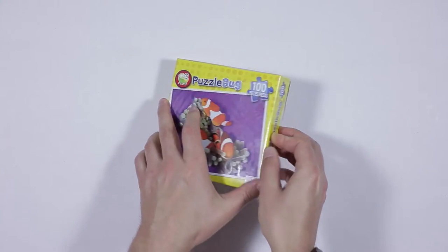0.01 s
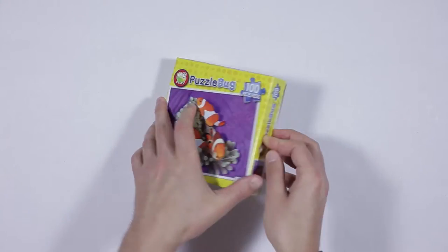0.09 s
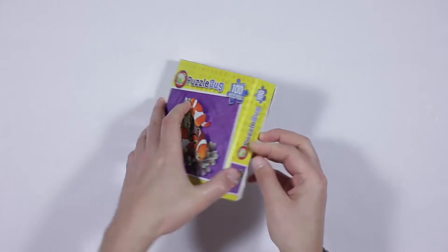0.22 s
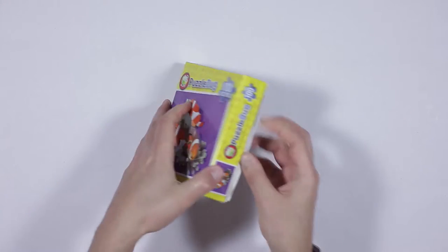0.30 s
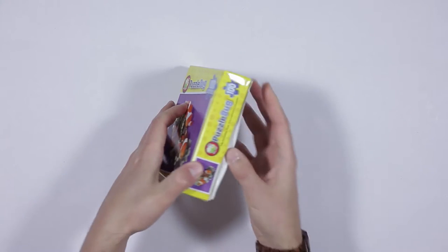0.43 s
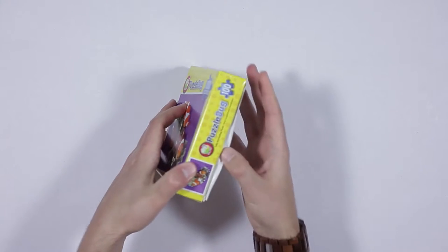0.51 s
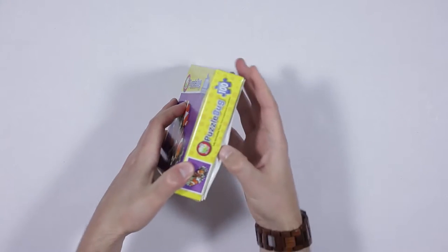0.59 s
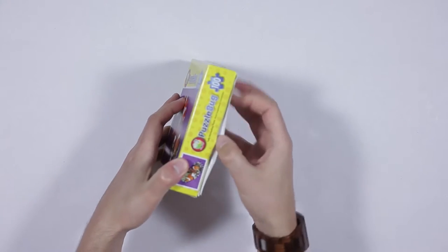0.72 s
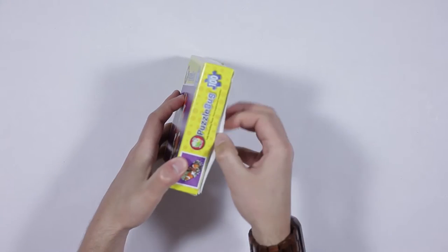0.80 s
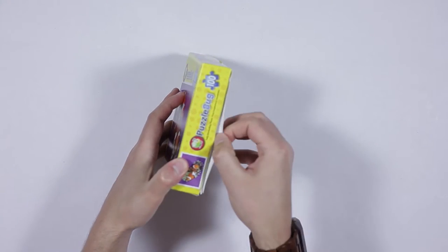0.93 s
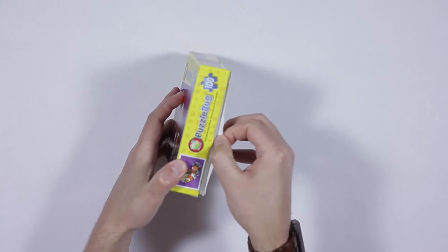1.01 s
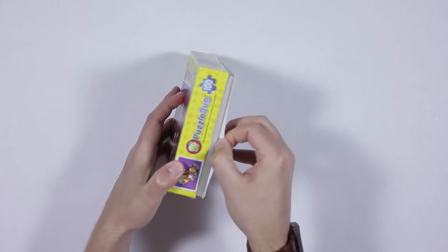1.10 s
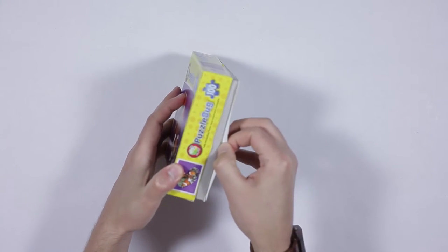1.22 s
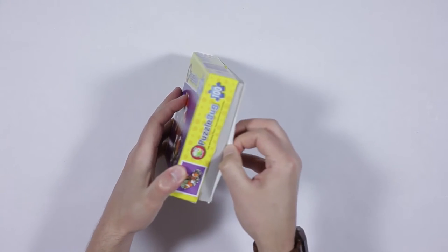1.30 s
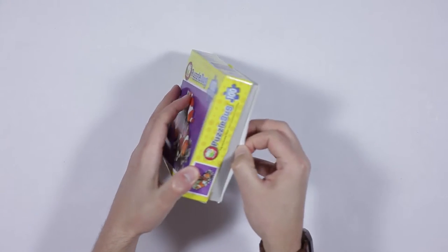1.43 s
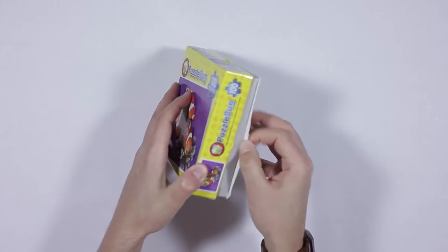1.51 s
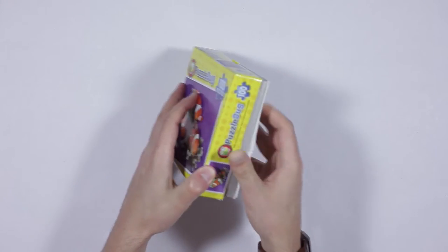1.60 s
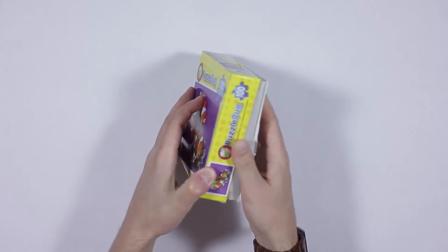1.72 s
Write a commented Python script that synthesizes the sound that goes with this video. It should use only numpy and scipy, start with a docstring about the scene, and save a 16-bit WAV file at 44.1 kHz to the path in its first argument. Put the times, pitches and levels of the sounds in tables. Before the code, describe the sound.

Cardboard puzzle box handled, its lid snapping loudly as loose pieces rattle inside, in a quiet room

```python
"""Hands turn a cardboard puzzle box and work at its lid while a quiet room hums throughout.
First fingers slide softly over the glossy card, loose pieces stir in the box and small ticks ride on top.
At 0.23 s the lid edge snaps free: a loud crack and rattle, then the pieces tumble and knock the hollow box.
Softer turns of the hands follow, with more ticks, knocks and sliding; at 1.46 s the lid snaps again, weaker,
and the box jolts. Bursts of noise make the snaps, ticks and knocks, streams of tiny contacts the rest."""
import sys
import numpy as np
from scipy import signal
from scipy.fft import rfft, irfft, next_fast_len
from scipy.io import wavfile
from scipy.ndimage import map_coordinates

SR = 44100
rng = np.random.default_rng(int(sys.argv[2]) if len(sys.argv) > 2 else 0)


def linear_from_db(decibels):
    """Turn decibels (scalar or array-like) into linear amplitude factors; 0 gives 1."""
    return 10 ** (np.asarray(decibels, float) / 20)


def unload_audio(sound):
    """Save the sound as a 16-bit wav file, at the path given as the first command line argument."""
    columns = np.transpose(np.atleast_2d(sound))
    # keep every value between -1 and 1, then stretch to whole-number steps
    steps = np.round(np.clip(columns, -1, 1) * 32767)
    wavfile.write(sys.argv[1], SR, steps.astype(np.int16))


N = 77175  # samples, 1.75 s


def unit(x):
    """Scale to rms 1."""
    return x / np.sqrt(np.mean(x ** 2) + 1e-20)


def along(points, hz):
    """Read (pitch_hz, value) points on a log pitch axis."""
    point_hz, value = np.transpose(points)
    return np.interp(np.log(hz + 1), np.log(point_hz + 1), value)


def filtered(x, response):
    """Shape x with a complex response of frequency."""
    size = next_fast_len(len(x) + 8192)
    spectrum = rfft(x, size) * response(np.fft.rfftfreq(size, 1 / SR))
    return irfft(spectrum, size)[:len(x)]


def causal(points):
    """Filter with the gain of (pitch_hz, level_db) points that answers as early as it can (minimum phase)."""
    def response(hz):
        cepstrum = irfft(np.log(np.maximum(linear_from_db(along(points, hz)), 1e-6)))
        half = len(cepstrum) // 2
        cepstrum[1:half] *= 2
        cepstrum[half + 1:] = 0
        return np.exp(rfft(cepstrum))
    return response


def resonances(peaks):
    """Ringing modes from (pitch_hz, width_hz, level_db); a narrow mode rings longer."""
    def response(hz):
        total = 0
        for k, (centre, width, db) in enumerate(peaks):
            damping = 1j * hz * width
            # neighbouring modes have opposite signs
            total = total + (-1) ** k * linear_from_db(db) * damping / (centre * centre - hz * hz + damping)
        return total
    return response


def high_pass(hz, corner_hz):
    """One gentle low cut: 6 dB per octave below the corner."""
    return hz / (hz - 1j * corner_hz)


def burst(t60, size=6000):
    """A sharp first contact and a dying spray of smaller ones; t60 in s, at least 0.002."""
    x = rng.standard_normal(size) * .5
    x[0] = 2
    return x * linear_from_db(-60 * np.arange(size) / SR / max(t60, .002))


def add(track, s, x, db):
    """Mix x into the track at time s with its peak at db."""
    part = track[round(s * SR):][:len(x)]
    part += linear_from_db(db) * (x / np.abs(x).max())[:len(part)]


def contacts(rate, spread_db):
    """Tiny impulses of uneven size (rate per second) on a bed of noise, coming in clumps."""
    bed_level, clump_db = 1.1, 1.1  # bed rms against the impulses; size of the swells
    chance, size = rng.random((2, N))
    hits = (chance < rate / SR) * linear_from_db(-spread_db * np.log(size + 1e-3)) * rng.standard_normal(N)
    clumps = map_coordinates(rng.standard_normal(N // 300 + 4), [np.arange(N) / 300])
    return unit((unit(hits) + bed_level * rng.standard_normal(N)) * linear_from_db(clump_db * clumps))


# when the levels jump at once to the next table, at the two lid snaps and at new movements of the hands:
# start_s
SECTION_STARTS = [.232, .508, .689, .885, 1.263, 1.461, 1.548]


def curves(tables):
    """One level per sample for each column after the time; each table rules until the next section starts."""
    t = np.arange(N) / SR
    each = []
    for start_s, *columns in map(np.transpose, tables):
        each.append([np.interp(t, start_s, column) for column in columns])
    section = np.searchsorted(SECTION_STARTS, t)
    return np.take_along_axis(np.array(each), section[None, None], axis=0)[0]


# the lid edge lets go: start_s, crack_peak_db, crack_t60_s, rattle_db (relative to the crack), rattle_t60_s
LID_SNAPS = [(.2316, 0, .004, -15, .04), (1.4612, -20, .006, -8, .045)]
# overall colour of the snap: pitch_hz, level_db
SNAP_TONE = [(250, -45), (500, -20), (1500, -12), (2100, -14), (2800, -3), (3900, -10), (4900, 1),
             (8600, 0), (9800, -9), (16000, -15)]
# the lid rings: pitch_hz, width_hz, level_db
LID_MODES = [(1540, 120, -4), (2540, 130, -2), (2880, 200, -5), (4750, 600, 0), (6050, 250, -2),
             (8000, 1200, -3)]


def snaps():
    """A broad crack rings the lid, then a longer burst rings it more strongly as a rattle."""
    out = np.zeros(N)
    for s, db, t60, rattle_db, rattle_t60 in LID_SNAPS:
        crack = filtered(burst(t60), lambda f: causal(SNAP_TONE)(f) + linear_from_db(-1) * resonances(LID_MODES)(f))
        add(out, s, crack, db)
        rattle = filtered(burst(rattle_t60), lambda f: causal(SNAP_TONE)(f) + linear_from_db(6) * resonances(LID_MODES)(f))
        add(out, s, rattle, db + rattle_db)
    return out


# notes of the hollow box: pitch_hz, width_hz, level_db
HOLLOW_MODES = [(621, 35, -6), (778, 60, 0), (865, 60, -7), (1090, 130, -8)]
# broad sound of the walls around those notes: pitch_hz, level_db (before the 15 dB cut below)
WALL_TONE = [(300, -40.5), (550, 4), (800, -9), (1300, -1.5), (2200, -57.5)]


def box(hz):
    """The box walls with their hollow resonances."""
    return resonances(HOLLOW_MODES)(hz) + linear_from_db(-15.0) * causal(WALL_TONE)(hz)


# big faces of the box: pitch_hz, width_hz, level_db
PANEL_MODES = [(260, 60, -11), (390, 30, -3), (443, 35, 0)]
# ringing of the card pieces: pitch_hz, width_hz, level_db
PIECE_MODES = [(1342, 35, -3.5), (1551, 69, -2.5), (1766, 71, -3.5), (2510, 750, -5), (3590, 990, -11.5),
               (4020, 1140, -12.5)]
# pieces tumbling, one table for each section between jumps: start_s, panels_db, hollow_body_db, clatter_db
TUMBLE_LEVELS = [
    [(0.0, -58, -51, -64), (0.02, -67, -50, -53), (0.056, -68.5, -57, -56), (0.13, -65, -54.5, -58.5),
     (0.146, -82, -58, -68), (0.156, -71, -60, -61), (0.216, -65, -55, -52.5)],
    [(0.242, -40, -41, -28.5), (0.257, -57, -31.5, -35), (0.272, -45.5, -41, -39),
     (0.318, -44, -36.5, -33.5), (0.41, -46, -40.5, -45), (0.454, -54, -46, -54.5),
     (0.495, -57, -53.5, -60.5)],
    [(0.512, -55, -45, -47.5), (0.524, -48.5, -58, -49.5), (0.54, -44.5, -48.5, -45.5),
     (0.606, -63, -50.5, -61), (0.63, -55.5, -54.5, -66), (0.652, -64, -62, -71), (0.676, -78, -72, -82)],
    [(0.694, -70, -64, -55), (0.714, -73, -68, -52.5), (0.73, -75, -53.5, -59), (0.758, -69, -68, -58.5),
     (0.772, -85, -84, -75), (0.87, -94, -93, -81), (0.872, -76, -81, -88)],
    [(0.89, -58.5, -54.5, -48.5), (0.984, -73, -62, -68.5), (1.008, -55.5, -62, -60.5),
     (1.07, -73, -58.5, -60.5), (1.108, -54, -54, -55), (1.212, -65.5, -56.5, -55.5),
     (1.255, -66, -63, -69)],
    [(1.27, -63, -65, -59), (1.288, -55.5, -56, -49.5), (1.32, -69, -55, -58), (1.338, -72, -45, -48.5),
     (1.362, -71, -53.5, -54), (1.392, -67, -51.5, -51), (1.414, -65, -47.5, -46), (1.446, -69, -52, -53.5)],
    [(1.472, -49.5, -52, -46), (1.515, -69, -56, -54), (1.538, -77, -64, -63)],
    [(1.553, -58.5, -60, -51), (1.579, -69, -62.5, -61.5), (1.625, -84, -58.5, -60),
     (1.637, -56.5, -80, -74), (1.655, -62, -57.5, -55), (1.733, -60.5, -57.5, -60), (1.75, -86, -64, -79)],
]


def tumble():
    """Many small contacts ring the panels, the hollow box and, piece on piece, the card itself."""
    def panel_response(hz):
        duller = 1 / (1 + 1j * hz / 600)  # treble falls above 600 Hz
        return resonances(PANEL_MODES)(hz) * high_pass(hz, 200) * duller

    def clatter_response(hz):
        broad = resonances([(2540, 3200, -16)])(hz)
        return (resonances(PIECE_MODES)(hz) + broad) * high_pass(hz, 900)

    panel_db, body_db, clatter_db = curves(TUMBLE_LEVELS)
    panels = unit(filtered(contacts(700, 1.5), panel_response))
    body = unit(filtered(contacts(900, 1.8), box))
    clatter = unit(filtered(contacts(2000, 1.6), clatter_response))
    return linear_from_db(panel_db) * panels + linear_from_db(body_db) * body + linear_from_db(clatter_db) * clatter


# three ranges of the sliding sound, from low to high, each: pitch_hz, level_db
RASP_TONE = [(2800, -50.5), (3700, 0.5), (4700, 5.5), (5900, 5), (7000, -5.5), (9000, -58.5)]
HISS_TONE = [(4800, -31), (6000, 0), (7000, 1.5), (8100, 3.5), (9000, -2), (10000, -15), (12500, -51)]
AIRY_TONE = [(7500, -30), (9300, -3), (10500, 0), (13000, -5), (16000, -10)]
# fingers sliding on glossy card, one table for each section between jumps: start_s, rasp_db, hiss_db,
# airy_top_db
SLIDE_LEVELS = [
    [(0.0, -51, -50.5, -58), (0.052, -57, -54, -69), (0.108, -53.5, -54.5, -59), (0.15, -65, -58.5, -70),
     (0.17, -61, -55, -68), (0.216, -52.5, -57.5, -69)],
    [(0.242, -31.5, -29, -41), (0.258, -40.5, -45, -49), (0.292, -38, -36, -47), (0.344, -41.5, -44.5, -63),
     (0.41, -48, -53, -62), (0.428, -55, -64, -78), (0.495, -65, -64.5, -88)],
    [(0.512, -63, -65, -90), (0.546, -61, -66, -87), (0.592, -67, -74, -93), (0.634, -77, -67, -86),
     (0.64, -75, -75, -88), (0.676, -68, -65.5, -82)],
    [(0.694, -58, -54, -61), (0.724, -51.5, -53, -60), (0.788, -69.5, -70.5, -83), (0.798, -76, -71, -64),
     (0.824, -68, -64, -84), (0.872, -93, -74, -81)],
    [(0.89, -53.5, -53, -63.5), (0.924, -61, -62, -70), (0.978, -70, -64.5, -61.5),
     (1.116, -51, -46, -60.5), (1.202, -61.5, -58.5, -61), (1.255, -76, -77, -93)],
    [(1.263, -65, -55, -69), (1.29, -62, -56.5, -66), (1.318, -62, -54, -63), (1.332, -54, -46, -64),
     (1.385, -69, -77, -82), (1.414, -51, -48, -61), (1.446, -50, -55.5, -59)],
    [(1.472, -42.5, -49, -39.5), (1.49, -50.5, -50, -68), (1.52, -54, -62, -64), (1.538, -58, -58, -66)],
    [(1.553, -57, -54, -67), (1.569, -60, -73, -77), (1.587, -56, -48.5, -53), (1.603, -69, -65, -71),
     (1.657, -48.5, -51, -58), (1.75, -79, -70, -78)],
]


def slide():
    """Fine stick-slip grains of skin on gloss, heard in three ranges."""
    grit = contacts(4000, 2.5)
    out = np.zeros(N)
    for db, tone in zip(curves(SLIDE_LEVELS), (RASP_TONE, HISS_TONE, AIRY_TONE)):
        out += linear_from_db(db) * unit(filtered(grit, causal(tone)))
    return out


# a piece or finger knocks the box wall: start_s, peak_db, hardness_hz, t60_s
WALL_KNOCKS = [(0.239, -26, 3200, 0.0074), (.257, -36, 1500, 0.049), (.307, -26.5, 4000, 0.11),
               (.405, -28, 1980, 0.013), (0.51, -51, 4000, 0.12), (.530, -31.5, 1510, 0.037),
               (0.5405, -29, 2450, 0.042), (0.557, -40, 3950, 0.05), (0.622, -47, 1480, 0.0086),
               (0.8845, -61, 4000, 0.015), (1.284, -42, 3530, 0.079), (1.33, -31.5, 3500, 0.047),
               (1.3952, -36, 2800, 0.034), (1.410, -32.5, 4230, 0.068), (1.461, -32.5, 2530, 0.035),
               (1.551, -37, 2860, 0.011), (1.71, -44, 3170, 0.039)]


def knocks():
    """Each knock rings box, panels and pieces; a soft one loses more treble."""
    out = np.zeros(N)
    for s, db, hard_hz, t60 in WALL_KNOCKS:
        def ring(hz):
            panels = linear_from_db(1) * resonances(PANEL_MODES)(hz)
            pieces = linear_from_db(-3.5) * resonances(PIECE_MODES)(hz)
            direct = linear_from_db(-2.0)
            softness = 1 / (1 + 1j * hz / hard_hz) ** 3
            return (box(hz) + panels + pieces + direct) * softness * high_pass(hz, 380) ** 3
        add(out, s, filtered(burst(t60), ring), db)
    return out


# ticks of card edges: start_s, peak_db, pitch_hz, t60_s
EDGE_TICKS = [(.0187, -32, 7600, .008), (.1025, -39, 8500, .012), (.1245, -38, 8800, .006),
              (.1725, -31, 7200, .012), (.2805, -20, 7200, .02), (.3065, -23, 6500, .015),
              (.330, -16.5, 7800, .018), (.508, -38, 3200, .01), (.5405, -37, 6000, .015),
              (.619, -50, 8000, .01), (.6315, -45, 8300, .01), (.699, -36, 4500, .008),
              (.9612, -46, 9500, .008), (1.0975, -33, 7900, .006), (1.1857, -39, 7600, .01),
              (1.2675, -39, 8000, .005), (1.2825, -43, 3600, .015), (1.2955, -38, 8000, .006),
              (1.3285, -34, 7600, .015), (1.348, -38, 10000, .005), (1.377, -44, 7500, .01),
              (1.463, -26, 5600, .008), (1.4665, -30, 3000, .01), (1.5475, -36, 3400, .008),
              (1.5478, -32, 5600, .008), (1.6525, -39, 5500, .01), (1.7118, -38, 2500, .012)]


def ticks():
    """Each tick is a short burst through one broad resonance, applied twice."""
    out = np.zeros(N)
    for s, db, hz, t60 in EDGE_TICKS:
        mode = resonances([(hz, hz / 1.8, 0)])
        add(out, s, filtered(burst(t60), lambda f: mode(f) ** 2), db)
    return out


# the box jolts in the hand: start_s, peak_db, pitch_hz, t60_s
JOLTS = [(1.46, -56, 72, .2), (1.462, -53, 132, .25), (1.46, -48, 255, .38)]


def jolt():
    """Low dying tones with a soft start make a thump."""
    out, t = np.zeros(N), np.arange(SR // 4) / SR
    for s, db, hz, t60 in JOLTS:
        soft_start = 1 - np.exp(-t / 0.00075)
        add(out, s, np.sin(2 * np.pi * hz * t) * linear_from_db(-60 * t / t60) * soft_start, db)
    return out


def room_echo(hits):
    """The room answers each hit with dying noise that begins after 4 ms."""
    echo_db, echo_t60_s = -14, .2
    t = np.arange(SR // 3) / SR
    tail = rng.standard_normal(len(t)) * linear_from_db(-60 * t / echo_t60_s) * (t > .004)
    return linear_from_db(echo_db) * signal.fftconvolve(hits, tail / np.linalg.norm(tail))[:N]


# colour of the steady room noise: pitch_hz, level_db (before it is set to its overall level)
ROOM_COLOUR = [(15, -28), (45, -21.5), (68, -21.5), (134, -28.5), (200, -26.5), (620, -26), (1660, -31),
               (4000, -37.5), (7500, -43.5), (16000, -55.5)]
# mains hum: pitch_hz, peak_db
HUM_TONES = [(62, -91), (121, -72)]


def room_tone():
    """Low rumble (noise in a narrow resonance), faint coloured hiss and mains hum (sines)."""
    noise_db, rumble_db, rumble_hz = -60.5, -61, 20.3  # levels are rms
    t = np.arange(N) / SR
    hum = sum(linear_from_db(db) * np.sin(2 * np.pi * hz * t) for hz, db in HUM_TONES)
    mode = resonances([(rumble_hz, 7, 0)])
    rumble = unit(filtered(rng.standard_normal(N), lambda f: mode(f) ** 2))
    noise = unit(filtered(rng.standard_normal(N), causal(ROOM_COLOUR)))
    return linear_from_db(noise_db) * noise + linear_from_db(rumble_db) * rumble + hum


def scene():
    """Hits get a short room echo; all sources mix to one channel."""
    hits = snaps() + knocks() + ticks() + jolt()
    mix = hits + room_echo(hits) + tumble() + slide() + room_tone()
    return mix[None]


def roll_off(x):
    """The treble ends steeply here."""
    return signal.sosfilt(signal.butter(12, 16410, fs=SR, output="sos"), x)


def record(dry):
    """Cut everything from 16 kHz up and finish the mix."""
    finished = filtered(dry[0], lambda hz: hz < 16000)[None]
    return roll_off(finished)


dry = scene()
out = record(dry)
unload_audio(out)
```